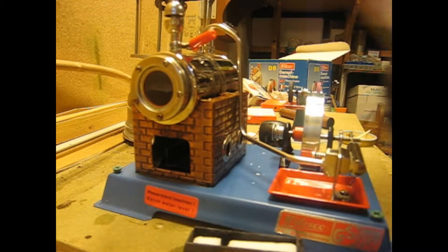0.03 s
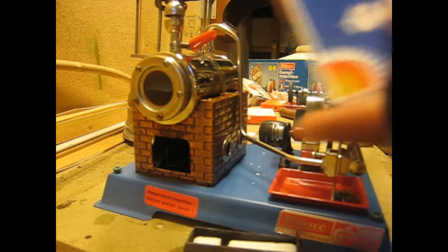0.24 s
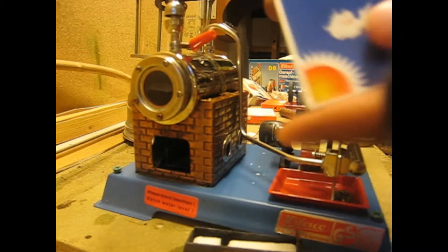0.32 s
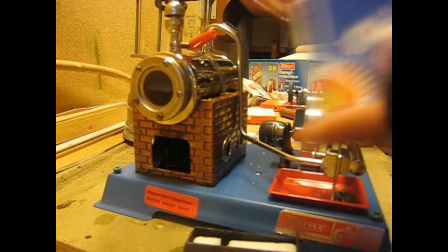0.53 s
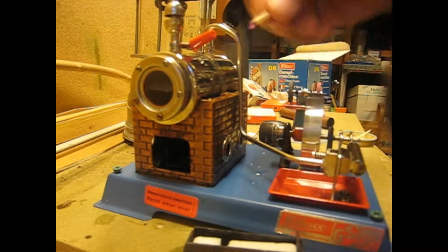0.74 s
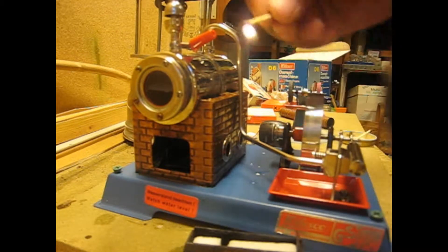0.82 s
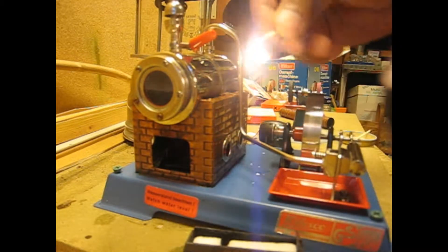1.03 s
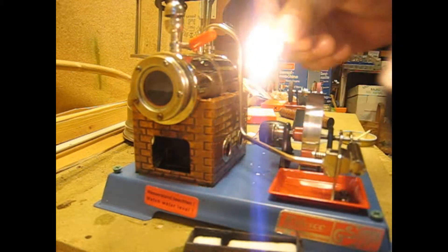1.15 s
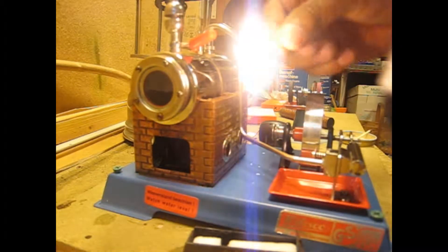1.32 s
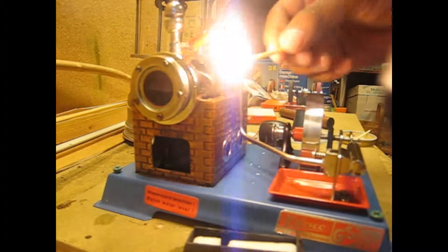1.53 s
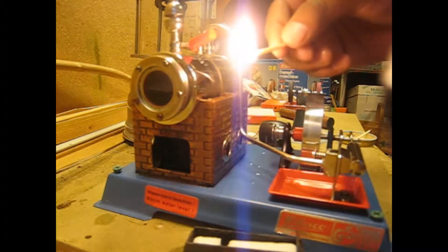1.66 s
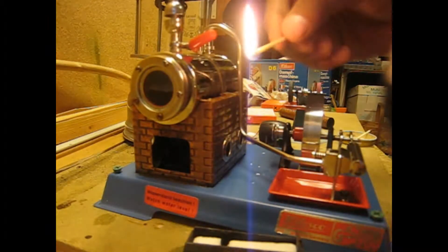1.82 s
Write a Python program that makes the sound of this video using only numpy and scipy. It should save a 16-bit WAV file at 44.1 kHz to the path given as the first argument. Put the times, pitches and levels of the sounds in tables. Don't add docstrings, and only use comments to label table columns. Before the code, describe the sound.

Match being struck near a cheap camera microphone; light box rattles and clicks first, then a brief scratchy scrape, ignition pop, breathy roaring burn, and a hard wooden clatter as the box drops, in a small, fairly dry room.

```python
import sys
import numpy as np
from scipy import signal
from scipy.fft import rfft, irfft, next_fast_len
from scipy.io import wavfile
from scipy.ndimage import uniform_filter1d, map_coordinates

SR = 44100
rng = np.random.default_rng(int(sys.argv[2]) if len(sys.argv) > 2 else 0)


def attenuation_scalar(level_db):
    decades = np.asarray(level_db, float) / 20
    return 10 ** decades


def digitize_waveform(pressure):
    field = np.atleast_2d(pressure).T
    bounded = np.clip(field, -1, 1)
    quanta = np.round(bounded * 32767).astype(np.int16)
    wavfile.write(sys.argv[1], SR, quanta)


N = 83790
T = np.arange(N) / SR


def unit(x):
    return x / np.sqrt(np.mean(x ** 2) + 1e-20)


def filtered(x, response):
    size = next_fast_len(N + 8192)
    hz = np.fft.rfftfreq(size, 1 / SR)
    return irfft(rfft(x, size) * response(hz), size)[..., :N]


def colour(points):
    points_hz, points_db = np.transpose(points)
    return lambda hz: attenuation_scalar(np.interp(np.log(hz + 1), np.log(points_hz), points_db))


def noise(response):
    return unit(filtered(rng.standard_normal(N), response))


def body(peaks):
    def response(f):
        total = 0
        for k, (centre, width, db) in enumerate(peaks):
            resonance = 1j * f * width / (centre ** 2 - f ** 2 + 1j * f * width)
            total = total + (-1) ** k * attenuation_scalar(db) * resonance
        return total
    return response


def wobble(rate):
    knots = rng.standard_normal(int(N * 400 / SR) + 4)
    return map_coordinates(knots, [T * rate])


def curve(points):
    return attenuation_scalar(np.interp(T, *np.transpose(points)))


def pressure(rows):
    total = np.zeros(N)
    for start_s, rise_ms, hold_ms, release_ms, db in rows:
        ms = (T - start_s) * 1e3
        fall_db = 20 * np.maximum(ms - rise_ms - hold_ms, 0) / release_ms
        total += attenuation_scalar(db - fall_db) * np.clip(ms / rise_ms, 0, 1)
    return total


def rubbing(rows, peaks, grains_per_s, spread_db):
    present, sign, size = rng.random((3, N))
    grit = (present < grains_per_s / SR) * np.sign(sign - .5)
    grit = grit * attenuation_scalar(-spread_db * np.log(size + 0.0096))
    steady_rms = np.sqrt(np.mean(filtered(grit, body(peaks)) ** 2))
    return filtered(grit * pressure(rows), body(peaks)) / steady_rms


def ticks(rows, peaks, t60_s, own, first):
    t, out = np.arange(2048) / SR, np.zeros(N + 2048)
    hz = np.fft.rfftfreq(4096, 1 / SR)
    box, dry_crack = body(peaks)(hz), body([(3300, 2400, 0)])(hz)
    for start_s, peak_db, pitch_hz, length_ms, crack in rows:
        contacts = rng.standard_normal(2048) - first * (t == 0)
        burst = contacts * np.exp(-t / (length_ms / 1e3))
        width_hz = 2.2 / t60_s * min(pitch_hz / 1800, 1)
        note = body([(pitch_hz, width_hz, 0)])(hz)
        dullness = (1 + 1j * hz / (1.8 * pitch_hz)) ** 2
        response = (box + own * note) / dullness + crack * dry_crack
        tick = irfft(rfft(burst, 4096) * response * (hz < 5500))[:2048]
        out[round(start_s * SR):][:2048] += attenuation_scalar(peak_db) * tick / abs(tick).max()
    return out[:N]


# pitch_hz, level_db
HUM_SPECTRUM = [(10, -28.5), (30, -5.5), (60, 0), (100, -1), (170, -9), (600, -18), (5500, -28)]


def hum():
    mains = attenuation_scalar(-59) * np.sin(2 * np.pi * 100 * T)
    return attenuation_scalar(-54.5) * noise(colour(HUM_SPECTRUM)) + mains


def room(near):
    t60_s, room_db = .12, -12.5
    tail = rng.standard_normal(SR // 4) * attenuation_scalar(-60 * T[:SR // 4] / t60_s)
    return attenuation_scalar(room_db) * signal.fftconvolve(near, tail / np.linalg.norm(tail))[:N]


# start_s, level_db (peak), pitch_hz
THUMPS = [
    (0.193, -33.5, 168),
    (0.357, -30.5, 87),
    (0.565, -35, 79),
    (1.262, -24, 394),
    (1.273, -33.5, 86.4),
    (1.504, -26, 62.2),
]


def thumps():
    out = np.zeros(N)
    for start_s, db, pitch_hz in THUMPS:
        u = np.maximum(T - start_s, 0)
        out += attenuation_scalar(db) * np.sin(2 * np.pi * pitch_hz * u) * np.exp(-1.2 * pitch_hz * u)
    return out


# pitch_hz, level_db
GRIP_SPECTRUM = [(20, -8.5), (80, -0.5), (200, -3.5), (400, -5.5), (900, -26.5)]


def grip():
    force = pressure(HANDLING + STROKE) + 0.32 * pressure(TUMBLE)
    return attenuation_scalar(-9) * noise(colour(GRIP_SPECTRUM)) * uniform_filter1d(force, size=400)


# start_s, rise_ms, hold_ms, release_ms, level_db
TUMBLE = [(1.259, 3.8, 5.1, 8, -36), (1.2695, 0.69, 10, 27, -34), (1.29, 23, 20, 4.3, -35),
          (1.3215, 1.5, 3.4, 7.3, -24), (1.331, 1.7, 22, 3, -30), (1.357, 5, 46, 7.3, -27),
          (1.41, 2.6, 28, 5.7, -31.5), (1.439, 1.8, 21, 8.4, -25), (1.462, 1.2, 20, 4.9, -32),
          (1.48, 0.86, 21, 9.8, -27.5), (1.502, 2.8, 5, 16, -20.5), (1.522, 0.41, 19, 10, -28),
          (1.55, 0.62, 4.1, 18, -33.5)]
# start_s, level_db (peak), pitch_hz, length_ms, crack_share
KNOCKS = [(1.2703, -33, 2500, 0.42, .1), (1.3075, -27.5, 1240, .8, .05), (1.322, -13.5, 1285, 1.3, 0.057),
          (1.325, -15.5, 1108, 1.04, 0.27), (1.329, -19, 1500, 0.69, 0.12), (1.3375, -23, 1450, 0.54, .05),
          (1.346, -24, 1350, 0.66, .05), (1.358, -18.5, 1290, .8, 0.061), (1.3797, -15.5, 1550, 0.58, 0.3),
          (1.388, -18, 1270, 1.8, 0.027), (1.3915, -18.5, 1300, 0.94, .05), (1.3945, -23, 2600, 0.36, .2),
          (1.3995, -24.5, 1410, 0.72, 0.085), (1.4062, -25, 2520, .5, 0.22),
          (1.4232, -15.5, 1420, 0.72, 0.024), (1.4415, -18, 1350, 1.3, 0.02),
          (1.4455, -24.5, 1500, 0.49, .03), (1.4518, -11, 1500, .4, 0.017), (1.455, -21.5, 1600, .8, 0.094),
          (1.4572, -12.5, 2720, 0.9, 0.05), (1.481, -18, 1614, 0.6, 0.23), (1.4835, -13, 1386, .8, 0.087),
          (1.4988, -14, 1450, 0.69, .03), (1.5027, -11, 1306, 1.6, .1), (1.5047, -5, 1385, 1.5, 0.97),
          (1.5063, -9.5, 2100, 0.87, 0.41), (1.5233, -12.5, 1520, 0.82, 0.01),
          (1.538, -22, 1490, 0.92, 0.1), (1.542, -21, 1350, 0.63, .05), (1.5455, -22, 1430, .6, 0.046)]
# pitch_hz, width_hz, level_db
BOX_ON_TABLE = [(960, 220, -8.5), (1290, 120, 1.5), (1500, 140, -2.5), (2200, 370, -11), (3630, 510, -19)]


def tumbling_box():
    sliding = rubbing(TUMBLE, BOX_ON_TABLE, grains_per_s=2400, spread_db=2.6)
    return sliding + ticks(KNOCKS, BOX_ON_TABLE, t60_s=0.005, own=1.8, first=7.6)


# start_s, rise_ms, hold_ms, release_ms, level_db
HANDLING = [(-.01, 15, 21, 12.7, -37), (.0635, 1.6, 26.8, 15, -33), (.125, 6, 25, 10.5, -45.5),
            (.183, 1.1, 8.1, 26, -34), (.222, 5.3, 4, 6, -42.5), (.268, 1.3, 12.7, 34, -45.5),
            (.316, 14, 22, 33, -29), (.414, 6.5, 5.9, 28, -43), (.443, 1.3, 5.5, 4.5, -32.5),
            (.479, 3.6, 14, 5.3, -33.5), (.51, 0.73, 6.2, 30, -40), (.706, 1, 4.6, 3.2, -46),
            (.735, 1.4, 27.5, 5.6, -44.5), (.771, 1.6, 5.8, 16, -37)]
# start_s, level_db (peak), pitch_hz,
# length_ms, crack_share
TICKS = [(.043, -26.5, 1960, 0.71, .05), (.1925, -20, 1680, 0.71, .2), (.2005, -34.5, 1430, 1.7, .2),
         (.326, -19, 1830, 1, .1), (.3343, -15, 1730, 0.35, .2), (.3372, -18, 1740, .8, .1),
         (.3435, -18, 1690, .8, .1), (.348, -22, 656, 1, .1), (.3522, -17.5, 1820, 1.6, .2),
         (.4445, -19.5, 1300, 1.5, .2), (.4583, -17.5, 1630, .5, 1), (.4652, -21.5, 1500, 0.61, 0.96),
         (.4745, -16.5, 1520, .8, .7), (.5095, -22.5, 1165, 0.8, 0.4), (.7065, -38, 1920, .8, .2),
         (.7365, -30, 800, 1.5, .1), (.7458, -30, 1950, 0.55, .1), (.7755, -20.5, 1540, 1.2, 1),
         (.798, -31.5, 1950, .6, .2), (.9215, -27.5, 1400, 1.5, .03), (.9515, -25, 1440, 1.5, .03),
         (.9735, -29.5, 1420, 1.5, .03),
         (.164, -22.5, 2090, 0.38, 0.45), (0.1665, -31.5, 1750, 0.44, 0.23), (.2278, -29, 1880, 0.68, .2),
         (0.23, -14.5, 1667, 0.58, 0.05), (0.2298, -13, 3150, 0.5, 0.049), (0.2508, -23.5, 2130, 1.9, .05),
         (0.253, -21.5, 3260, 1, 0.1), (0.2516, -22.5, 3270, 0.88, 0.34), (0.269, -32.5, 1500, 0.73, .5),
         (0.7757, -25, 4570, 2.9, 0.86), (.784, -24, 2790, 0.93, 0.19), (1.0641, -25.5, 2960, 0.81, .1)]
# pitch_hz, width_hz, level_db
BOX_IN_HAND = [(659, 260, -9), (1281, 200, -4.5), (1778, 220, -0.5), (2200, 240, -8), (3150, 730, -9.5),
               (4113, 710, -20)]


def handled_box():
    shifting = rubbing(HANDLING, BOX_IN_HAND, grains_per_s=4000, spread_db=2.5)
    return shifting + ticks(TICKS, BOX_IN_HAND, t60_s=0.0054, own=3.7, first=3.6)


# start_s, level_db
FLAME = [(.3, -51), (.63, -45.5), (.7, -52), (.82, -47.5), (.835, -57.5), (.845, -56), (.88, -40),
         (1.2, -42), (1.5, -38.5), (1.62, -44), (1.72, -47), (1.762, -49.5), (1.77, -63), (1.81, -59.5),
         (1.9, -64)]
# pitch_hz, level_db
ROAR_SPECTRUM = [(20, -11), (60, -7.5), (100, 1), (200, -1.5), (400, -11), (800, -22.5)]
# start_s, level_db
FIZZ = [(.875, -70.5), (.92, -54), (1.0, -54.5), (1.12, -60.5), (1.24, -49.5), (1.31, -54), (1.36, -75)]
# pitch_hz, width_hz, level_db
BENCH = [(606.3, 90, 0.5), (1350, 300, -8), (2333, 490, -10.5), (3077, 530, -10.5), (4370, 1500, -12.5)]


def flame():
    pop_s, pop_db, pop_ms, pop_ring_db = .8697, -11, 0.13, -15
    u = np.maximum(T - pop_s, 0) / (pop_ms / 1e3)
    pop = -attenuation_scalar(pop_db) * np.e * u * (1 - 0.18 * u) * np.exp(-u)
    pop = pop + attenuation_scalar(pop_ring_db) * 10 * filtered(pop, body(BENCH))

    flutter = rng.standard_normal(N) * attenuation_scalar(1.9 * wobble(150))
    hiss = unit(filtered(flutter, body(BENCH))) * attenuation_scalar(0.99 * wobble(20))
    roar = noise(colour(ROAR_SPECTRUM)) * attenuation_scalar(-4 + 2.5 * wobble(13))

    spitting = rng.standard_normal(N) * attenuation_scalar(2.5 * wobble(120))
    fizz = unit(filtered(spitting, body([(4450, 1700, 0)])))
    return pop + curve(FIZZ) * fizz + curve(FLAME) * (hiss + roar)


# start_s, rise_ms, hold_ms, release_ms, level_db
STROKE = [
    (0.5529, 1.1, 8, 3.1, -24.5),
    (0.562, 0.76, 4.2, 3.6, -22),
    (.575, 1.6, 11, 3.4, -25.5),
    (0.591, 2, 2.9, 6.4, -25.5),
    (0.598, 2.4, 8.2, 13, -28),
]
# start_s, level_db (peak), pitch_hz, length_ms, crack_share
CATCHES = [(.5476, -15.5, 640, 2.3, 0.35), (.548, -12, 1710, 0.32, .8), (.5538, -19.5, 1740, 1.3, .1),
           (.5628, -13.5, 1850, 1.1, 0.13), (.566, -19, 1620, 1.8, .1), (.5701, -4, 2040, 0.6, 0.082),
           (.5775, -16.5, 716, 1.5, 0.56), (.5815, -17, 616, 3.2, .1), (.5831, -9.5, 3360, 0.19, 1),
           (.585, -17, 732, 2.5, 0.19), (.592, -19.5, 800, 2.1, 0.039), (.5933, -12.5, 3470, 0.54, 0.46),
           (.594, -14, 1660, 0.91, 0.18), (.597, -19.5, 800, 0.67, 0.11), (.6038, -17, 2200, 1.2, 1),
           (.6053, -19, 2190, 0.55, 0.95)]
# pitch_hz, width_hz, level_db
STRIP = [(621, 110, -1.5), (800, 140, -9.5), (1420, 310, -3.5), (1950, 480, 0.5), (3150, 2100, -8.5),
         (4160, 1000, -6.5)]


def match_strike():
    scrape = rubbing(STROKE, STRIP, grains_per_s=1800, spread_db=3)
    return scrape + ticks(CATCHES, STRIP, t60_s=0.0058, own=3.4, first=4.5)


def scene():
    near = handled_box() + match_strike() + tumbling_box()
    mix = near + room(near) + thumps() + grip() + flame() + hum()
    return mix[None]


def roll_off(x):
    return signal.sosfilt(signal.butter(12, 9900, fs=SR, output="sos"), x)


# pitch_hz, level_db
SMOOTHING_FILTER = [(1200, 0),
                    (2500, 0), (4000, -4.5), (5500, -12), (7000, -25.5), (8500, -39.5), (9800, -60),
             (10100, -100.5)]


def record(dry):
    slower, step = 4, 1 / 128
    slow = filtered(dry, lambda hz: hz < SR / slower / 2)[:, ::slower]
    stepped = step * np.round(slow / step + .25)
    comb = np.zeros_like(dry)
    comb[:, ::slower] = slower * stepped
    return roll_off(filtered(comb, colour(SMOOTHING_FILTER)))


dry = scene()
out = record(dry)
digitize_waveform(out)
```